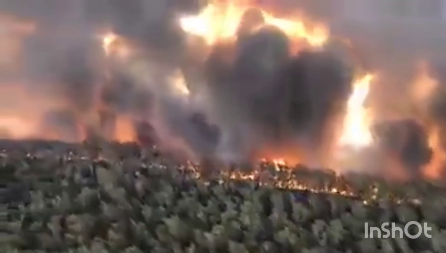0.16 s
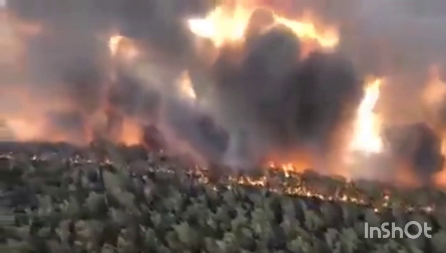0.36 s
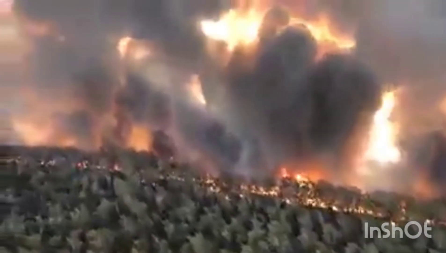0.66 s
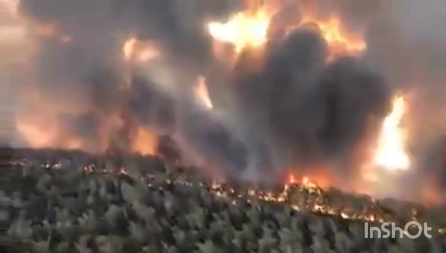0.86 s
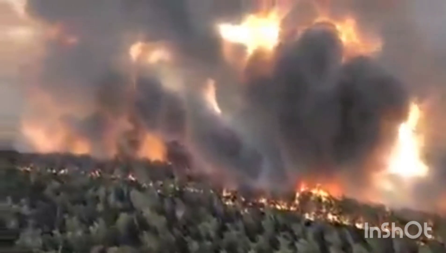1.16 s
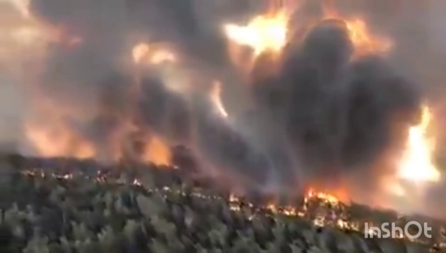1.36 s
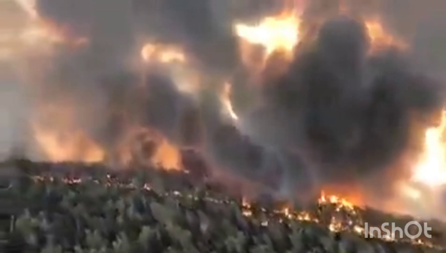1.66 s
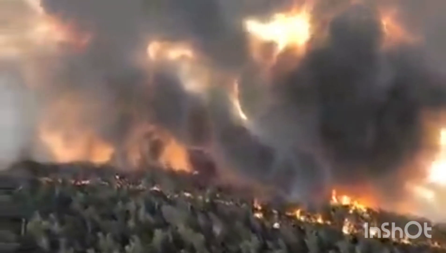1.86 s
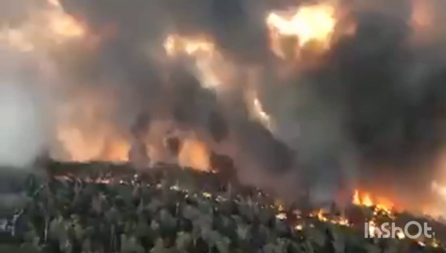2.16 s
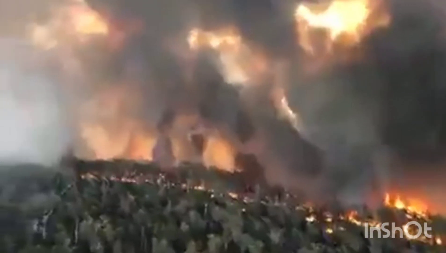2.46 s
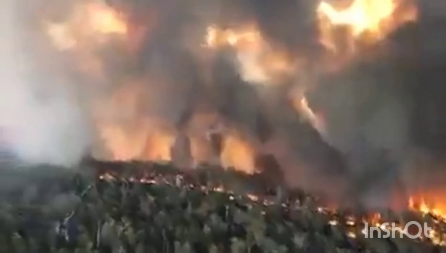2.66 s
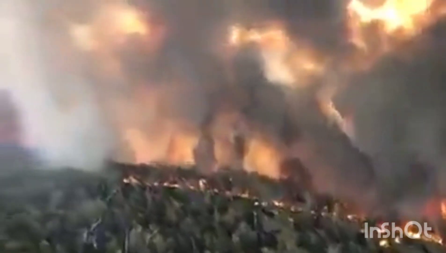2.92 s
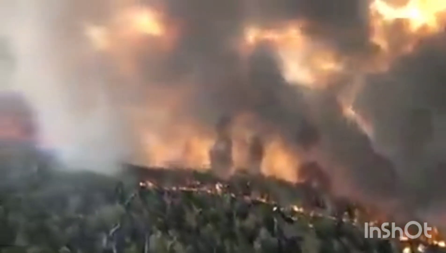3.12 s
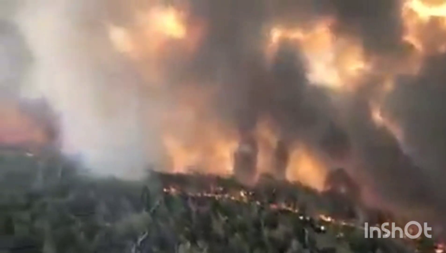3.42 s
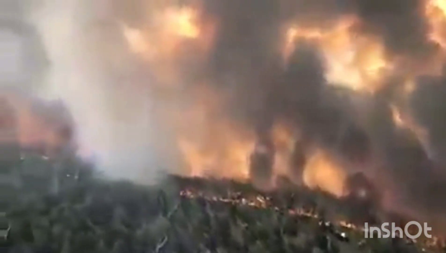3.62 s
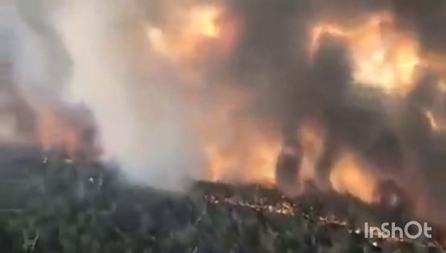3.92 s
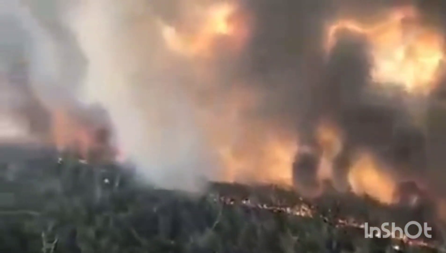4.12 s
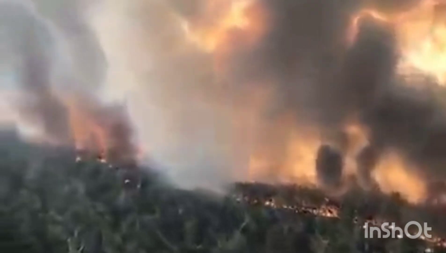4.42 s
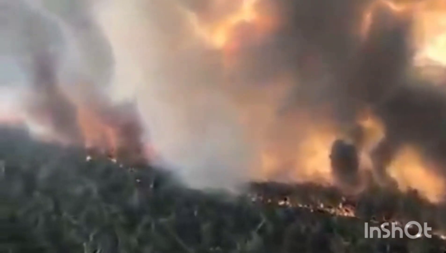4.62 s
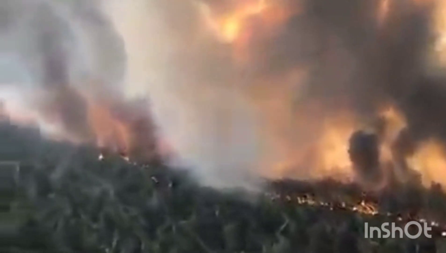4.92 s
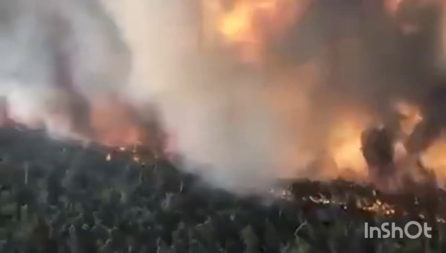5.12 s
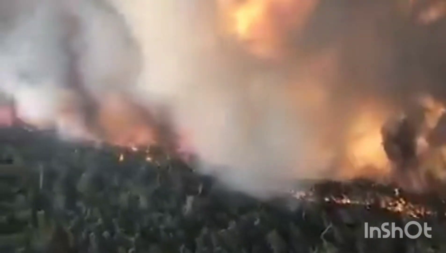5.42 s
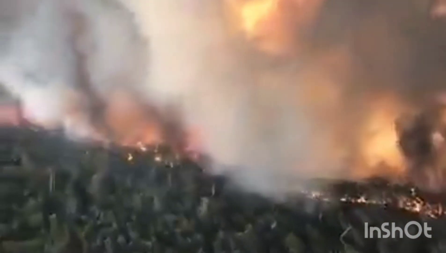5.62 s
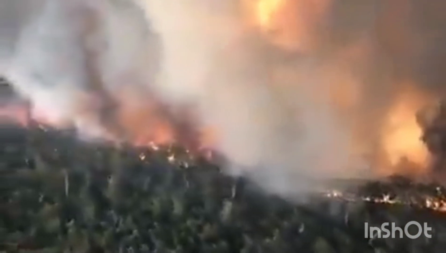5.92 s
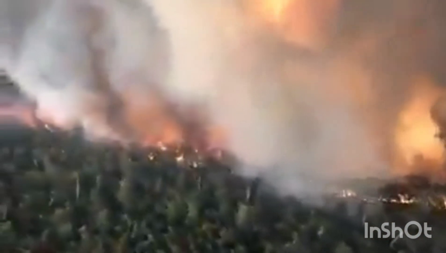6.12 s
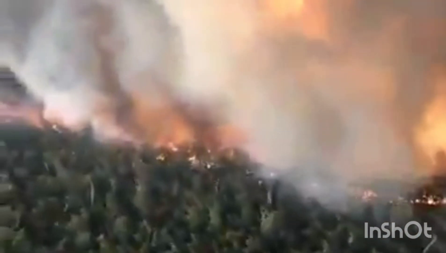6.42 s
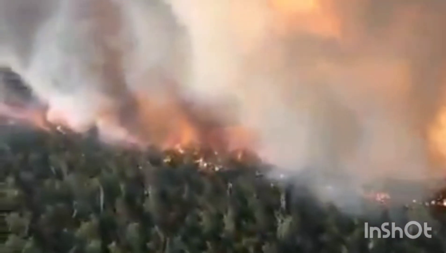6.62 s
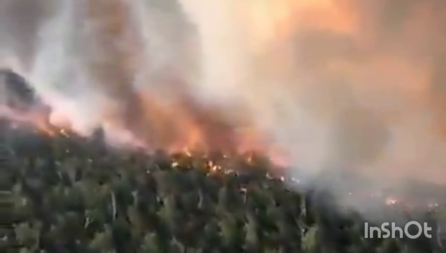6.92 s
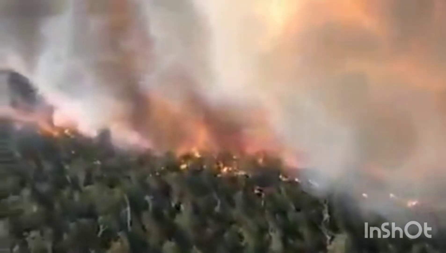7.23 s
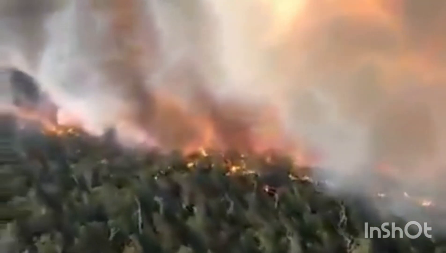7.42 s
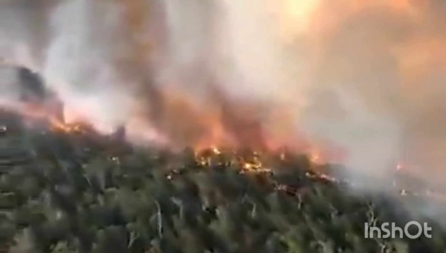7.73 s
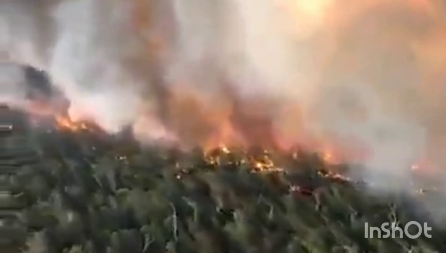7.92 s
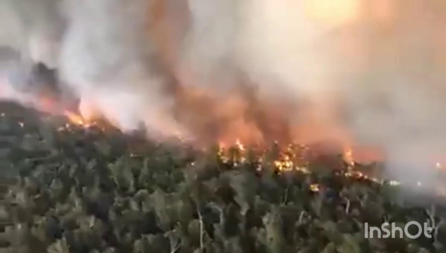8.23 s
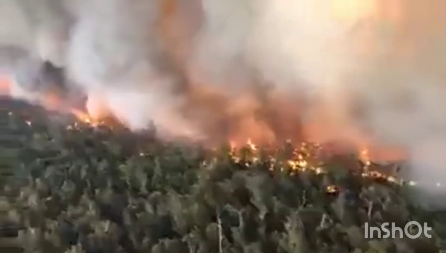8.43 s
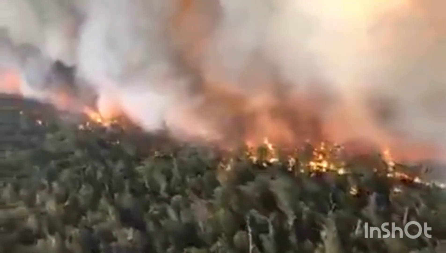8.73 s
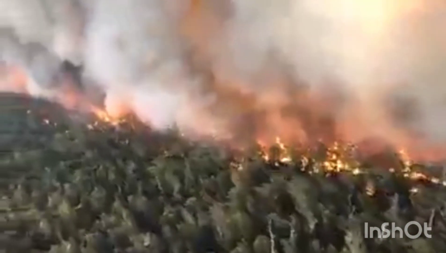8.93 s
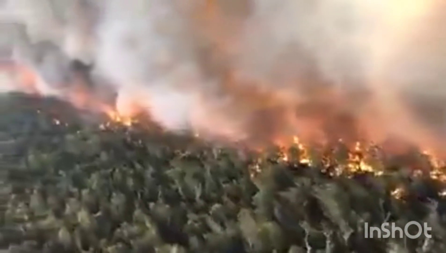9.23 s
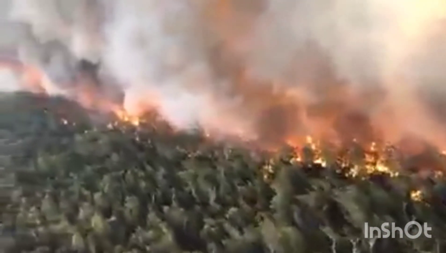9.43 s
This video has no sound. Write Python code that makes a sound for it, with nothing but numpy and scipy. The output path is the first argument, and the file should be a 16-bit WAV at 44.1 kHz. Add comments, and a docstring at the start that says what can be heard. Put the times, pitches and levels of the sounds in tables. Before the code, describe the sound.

A helicopter over a forest fire is heard from aboard, close and overloaded. From 0 s, blades slap about fifteen times a second, each a short hollow knock with a noisy crack and a low thump. Harder, brighter slaps cluster from 0.8 to 1.8 s, with a heavy one near 2.9 s. Meanwhile, rushing wash, low roar and body rumble rise, and slaps deepen and smear into pairs. Around 4.4 s the load crests with two deep wavering hums, faint turbine whine and a rough howl gliding down. At 4.9 s it steps down and fades within about half a second. Slaps stand out again, hard ones clustering from 5.4 to 6.5 s, as a second swell builds, cresting with another howl near 9.1 s and dropping after 9.5 s. Tone is muffled and clipped, with faint high hiss on peaks.

```python
"""Helicopter blades slap the air at once, each leaving a low thump, heard through an overloaded microphone.
Slaps are short rings with bursts of noise; now and then one hits harder and snaps brighter.
Twice the load builds: the slaps spread into pairs and sink into rotor wash made of coloured noise,
with two deep hum tones, an airframe rumble and a breathy turbine whine of narrow noise.
A rough howl glides down through each crest; then the load drops away."""
import sys
import numpy as np
from scipy import signal
from scipy.fft import rfft, irfft, next_fast_len
from scipy.io import wavfile
from scipy.ndimage import uniform_filter1d

SR = 44100
rng = np.random.default_rng(int(sys.argv[2]) if len(sys.argv) > 2 else 0)


def bounce(signal):
    """Save signal as a 16-bit WAV file at the path given by the first command-line argument."""
    frames = np.transpose(np.atleast_2d(signal))
    limited = np.clip(frames, -1, 1)
    pcm = np.round(limited * 32767).astype(np.int16)
    wavfile.write(sys.argv[1], SR, pcm)


N = 422037
TIME_S = np.arange(N) / SR

# crack of a blade slap: relative spectrum [freq_hz, density_db]
CRACK_SPECTRUM = [(120, -11), (220, 0.5), (330, -0.5), (470, 2.5), (570, -7.5), (730, -4.5), (920, -7),
                  (1250, -12), (1800, -16), (2600, -24.5), (2900, -35.5), (4300, -45.5)]
# snap of a hard slap: relative spectrum [freq_hz, density_db]
SNAP_SPECTRUM = [(300, 0), (500, 3), (720, 4), (950, -2), (1250, -7.5), (1800, -8.5), (2650, -19.5),
                 (3000, -27.5), (4300, -40)]
# rumble of the body: relative spectrum [freq_hz, density_db]
RUMBLE_SPECTRUM = [(15, -10.5), (30, -7.5), (45, 3), (62, 4), (100, 1.5), (130, 4), (170, -1.5),
                   (250, -5.5), (450, -9.5), (600, -18), (1200, -30.5), (4000, -44)]
# hollow boom of the body: relative spectrum [freq_hz, density_db]
BOOM_SPECTRUM = [(200, -26), (270, -2.5), (315, 3), (400, 2), (470, -11.5), (600, -31), (1500, -50)]
# broad rush of the wash: relative spectrum [freq_hz, density_db]
RUSH_SPECTRUM = [(200, -17), (330, 1), (520, 1.5), (800, -0.5), (1150, -4.5), (1700, -7), (2200, -10),
                 (2650, -15.5), (2800, -19), (3500, -21), (4300, -32)]
# low roar of the wash: relative spectrum [freq_hz, density_db]
ROAR_SPECTRUM = [(110, -5.5), (160, 3.5), (230, 1.5), (330, -2), (420, -4), (600, -5), (1200, -63)]
# even hiss: relative spectrum [freq_hz, density_db]
HISS_SPECTRUM = [(500, -15.5), (1200, 4), (2600, 2.5), (3500, 0), (4300, -19.5)]
# faint high hiss that swells with loud peaks: relative spectrum [freq_hz, density_db]
HIGH_HISS_SPECTRUM = [(3000, -29), (4500, -5.5), (8000, -5.5), (11000, -12.5), (15000, -20)]
# blades meeting the tip vortices [time_s, lead_delay_ms, trail_delay_ms]
SLAP_DELAYS = [(0, 26.5, 30.4), (.35, 28, 31.3), (.56, 17, 23.4), (1.2, 16.4, 23.5), (1.52, 23, 26),
               (1.95, 18.4, 23.2), (2.45, 16.6, 24.5), (3.3, 8.73, 23.9), (4.9, 7.6, 25.1),
               (5.4, 16.6, 21.2), (5.7, 16.2, 20), (6.1, 19, 27), (6.55, 13.2, 36.3), (6.95, 13, 43),
               (7.4, 8.05, 46), (7.8, 7.44, 31.7), (9.57, 14.4, 35.2)]
# hardest slaps, relative levels [time_s, ring_db, ring_hz, snap_db]
HARD_SLAPS = [(0.167, -12, 732, -17.5), (0.56, -7, 283, -20), (0.828, 0, 423, -13.5),
              (0.971, -1, 460, -9.5), (1.032, 3, 393, -9), (1.099, -2.5, 310, -9.5),
              (1.176, -1.5, 437, -11), (1.245, 1, 355, -9.5), (1.452, -2, 472, -6.5),
              (1.516, 1, 438, -11.5), (1.649, -1, 319, -8.5), (1.724, -4, 744, -7),
              (1.781, 6.5, 328, -10.5), (2.657, 4, 291, -6), (2.744, -0.5, 697, -3), (2.866, 14, 299, -10),
              (3.267, 1.5, 317, -3.5), (4.285, 3, 282, -3), (5.451, 0.5, 410, -12), (5.596, -2.5, 475, -9),
              (5.726, -5.5, 473, -10.5), (5.801, 2, 444, -10.5), (5.867, 0, 403, -10),
              (6.074, -2.5, 410, -7.5), (6.141, -1.5, 362, -11.5), (6.349, -3.5, 721, -7),
              (6.406, 1.5, 305, -10.5), (6.48, 2, 370, -9), (7.018, -7, 675, -10.5), (7.389, -2, 730, -7.5),
              (7.886, -0.5, 293, -8)]
# swells of rotor load [start_s, crest_s, end_s, strength_0_to_1, rush_rise_power, lows_rise_power]
LOAD_SWELLS = [(0, 4.45, 4.92, 1.0, 0.73, .72), (5.35, 9.1, 9.475, .98, 0.52, 0.48)]
# slap level before trims [no_load_db, third_load_db, two_thirds_load_db, full_load_db]
SLAP_LEVELS_DB = (-18.5, -8, -2.5, -2)
# thump level [no_load_db, third_load_db, two_thirds_load_db, full_load_db]
THUMP_LEVELS_DB = (-16, -6, -5.5, -14)
# rumble level [no_load_db, third_load_db, two_thirds_load_db, full_load_db]
RUMBLE_LEVELS_DB = (-32, -22, -16.5, -19)
# boom level before trims [no_load_db, third_load_db, two_thirds_load_db, full_load_db]
BOOM_LEVELS_DB = (-31.5, -29, -22.5, -26)
# rush level [no_load_db, third_load_db, two_thirds_load_db, full_load_db]
RUSH_LEVELS_DB = (-36, -27, -20, -11.5)
# roar level [no_load_db, third_load_db, two_thirds_load_db, full_load_db]
ROAR_LEVELS_DB = (-39.5, -29.5, -23, -10)
# lower hum level [no_load_db, third_load_db, two_thirds_load_db, full_load_db]
HUM_LOW_LEVELS_DB = (-42, -33, -31.5, -12.5)
# upper hum level before its gain past a crest [no_load_db, third_load_db, two_thirds_load_db, full_load_db]
HUM_HIGH_LEVELS_DB = (-43, -37.5, -28.5, -18.5)

BLADE_HZ = 14.7
SPLIT_DB_PER_MS, BOOM_DB_PER_MS = 0.1267, 0.18  # as a pair spreads: slap loss, boom gain
DROP_S, RUSH_FALL_S, ROAR_FALL_S, HUM_FALL_S = 0.022, 0.4, 0.57, 0.5  # step down, then decays
LULL_DB, LULL_AFTER_S, LULL_WIDTH_S = -8, 0.56, 0.24  # slaps and boom dip past a crest
HUM_LOW_HZ, HUM_LOW_SAG_HZ_PER_S, HUM_SAG_S = 175.1, 6, 1.1  # at crest; sag either side of it
HUM_HIGH_HZ, HUM_HIGH_SAG_HZ_PER_S, HUM_HIGH_DB_PER_S = 235.9, 1.5, 4.5  # gains past a crest
WHINE_HZ, WHINE_RE_RUSH_DB = 1207, -11.5
HOWL_FLOOR_HZ, HOWL_GLIDE_HZ, HOWL_GLIDE_S = 1086, 214.9, 0.6
HOWL_DB, HOWL_RISE_S, HOWL_HOLD_S, HOWL_FALL_S = -17, 0.3, 0.28, 0.38
BAND_HZ, TOP_HZ = 4350, 15700  # low-passes before and after clipping


def undb(db):
    """Decibels to gain."""
    return 10 ** (np.asarray(db) / 20)


def curves(table):
    """Table columns joined by straight lines in time."""
    time_s, *columns = np.transpose(table)
    return [np.interp(TIME_S, time_s, column) for column in columns]


def walk(rate_hz):
    """Random levels held 1 / rate_hz and slewed twice; spread near 1."""
    hold = int(SR / rate_hz)
    held = np.repeat(rng.standard_normal(N // hold + 1), hold)
    return 1.283 * uniform_filter1d(uniform_filter1d(held, hold), hold)[:N]


def noise(spectrum):
    """Noise of rms 1, coloured by a spectrum on a log frequency axis."""
    freq_hz, db = np.transpose(spectrum)
    size = next_fast_len(N, True)
    bins_hz = np.maximum(np.fft.rfftfreq(size, 1 / SR), 1)
    gain = undb(np.interp(np.log(bins_hz), np.log(freq_hz), db))
    x = irfft(rfft(rng.standard_normal(size)) * gain, size)[:N]
    return x / x.std()


def burst(age, rise, fall):
    """Bell envelope with its own rise and fall, in the unit of the age."""
    return np.exp(-.5 * (age / np.where(age < 0, rise, fall)) ** 2)


def saturate(x, ceiling, order):
    """Rounds peaks under a ceiling; higher order, harder knee."""
    return x / (1 + np.abs(x / ceiling) ** order) ** (1 / order)


def swell(lows, drop, fall_s, fall_power):
    """Rotor load 0-1 as rush or lows follow it: builds, holds, steps down by a share, dies away."""
    load = np.zeros(N)
    for start_s, crest_s, end_s, strength, rush_power, lows_power in LOAD_SWELLS:
        progress = np.clip((TIME_S - start_s) / (crest_s - start_s), 0, 1)
        rise = progress ** (lows_power if lows else rush_power)
        after_s = np.clip(TIME_S - end_s, 0, 1)
        step = 1 - drop * np.minimum(after_s / DROP_S, 1)
        fall = step * np.exp(-(after_s / fall_s) ** fall_power)
        load = np.maximum(load, strength * rise * fall)
    return load


def follow(load, levels_db):
    """Layer level in dB at that load."""
    return np.interp(load, np.linspace(0, 1, len(levels_db)), levels_db)


def since_crest():
    """Seconds from the nearest swell crest, negative before it."""
    crests_s = np.array([row[1] for row in LOAD_SWELLS])
    midpoints_s = (crests_s[1:] + crests_s[:-1]) / 2
    return TIME_S - crests_s[np.searchsorted(midpoints_s, TIME_S)]


def lull():
    """Level change in dB of the short lull past each crest."""
    return LULL_DB * burst(since_crest() - LULL_AFTER_S, LULL_WIDTH_S, LULL_WIDTH_S)


def passages(delay_ms, scatter_ms):
    """Per sample: ms from the nearest blade's scattered arrival, and three random values of that blade."""
    turns = (TIME_S - delay_ms / 1000) * BLADE_HZ
    blade = np.round(turns).astype(int)
    chance = rng.standard_normal(size=(160, 4))[blade].T
    age_ms = 1000 * (turns - blade) / BLADE_HZ
    return age_ms + scatter_ms * chance[0], chance[1:]


def cycles(age_ms, hz):
    """Phase in radians: frequency times age."""
    return 2 * np.pi * hz * age_ms / 1000


def slap(delay_ms, ring_hz, ring_db, crack_db, rise_ms, fall_ms):
    """A blade cuts a tip vortex: a few slowing pressure cycles in a turbulent crack, varied per blade."""
    age_ms, (size, pitch, phase) = passages(delay_ms, scatter_ms=1.217)
    hz = ring_hz * np.exp(.11 * pitch - age_ms / 140)
    ring = undb(ring_db + 0.47 * size) * np.cos(cycles(age_ms, hz) + np.pi * phase)
    crack = undb(crack_db + 1.5 * size + 2.62 * walk(200)) * noise(CRACK_SPECTRUM)
    return burst(age_ms, rise_ms, fall_ms) * (ring + crack)


def thump(delay_ms, push_hz, rise_ms, fall_ms):
    """The blade's load follows as one low swing: push, suction, push."""
    age_ms, (size, pitch, phase) = passages(delay_ms, scatter_ms=1.8)
    hz = push_hz * np.exp(.12 * pitch)
    swing = -np.cos(cycles(age_ms, hz) + .45 * phase)
    return undb(0.41 * size) * burst(age_ms, rise_ms, fall_ms) * swing


def hard_slaps():
    """A blade hits its vortex squarely: steadier-pitched ring, brighter snap; also how far each takes over."""
    sound, share, snap = np.zeros(N), np.zeros(N), noise(SNAP_SPECTRUM)
    phases = rng.uniform(0, 2 * np.pi, len(HARD_SLAPS))
    for (time_s, ring_db, ring_hz, snap_db), phase in zip(HARD_SLAPS, phases):
        near = slice(int((time_s - .04) * SR), int((time_s + .05) * SR))
        age_ms = 1000 * (TIME_S[near] - time_s)
        hz = ring_hz * np.exp(-age_ms / 300)
        ring = burst(age_ms - 3, rise=1.4, fall=6.1) * np.cos(cycles(age_ms, hz) + phase)
        crack = burst(age_ms - 2, rise=2.0, fall=6.2) * snap[near]
        sound[near] += undb(ring_db - 2.0) * ring + undb(snap_db + 1.5) * crack
        share[near] = np.maximum(share[near], burst(age_ms - 2, rise=6.9, fall=6.8))
    return sound, share


def main_rotor(load):
    """Two slaps and a thump per blade; slaps merge as delays meet, and deepen and smear under load."""
    lead_ms, trail_ms = curves(SLAP_DELAYS)
    ring_hz = 420 * 2 ** (-.82 * np.maximum(load - .4, 0))
    smear = 0.82 + 0.4 * load
    leading = slap(lead_ms - 2, ring_hz, ring_db=1.0, crack_db=-3.0,
                   rise_ms=1.4 * smear, fall_ms=8 * smear)
    trailing = slap(trail_ms - 2, 0.856 * ring_hz, ring_db=1.5, crack_db=-2.0,
                    rise_ms=1.3 * smear, fall_ms=7.33 * smear)
    split_db = SPLIT_DB_PER_MS * (trail_ms - lead_ms)
    slap_db = follow(load, SLAP_LEVELS_DB) - split_db + lull() + 1.42 * walk(7)
    low = thump(trail_ms + 9, push_hz=75.3, rise_ms=7.3, fall_ms=4.5)
    thump_db = follow(load, THUMP_LEVELS_DB) + 1.2 * walk(9)
    hard, share = hard_slaps()
    slaps = undb(slap_db - 11 * share) * (leading + trailing)  # ducked under hard slaps
    return slaps + hard + undb(thump_db) * low


def rotor_wash(rush_db, roar_db):
    """Churning air: broad rush over low roar, both fluttering, plus a faint even hiss."""
    rush = noise(RUSH_SPECTRUM) * undb(rush_db + 1.48 * walk(25))
    roar = noise(ROAR_SPECTRUM) * undb(roar_db + 1.2 * walk(12))
    return rush + roar + undb(-46.0) * noise(HISS_SPECTRUM)


def airframe(load):
    """The body rumbles, throbs near four times the blade rate, and booms more as slap pairs spread."""
    lead_ms, trail_ms = curves(SLAP_DELAYS)
    throb_hz = 61.5 + 4 * walk(7.9)
    throb = undb(-8.0 + 3.7 * walk(4.2)) * np.sin(2 * np.pi * np.cumsum(throb_hz) / SR)
    rumble_db = follow(load, RUMBLE_LEVELS_DB) + 1.5 * walk(5)
    rumble = (noise(RUMBLE_SPECTRUM) + throb) * undb(rumble_db)
    spread_db = BOOM_DB_PER_MS * (trail_ms - lead_ms)
    boom_db = follow(load, BOOM_LEVELS_DB) + spread_db + .7 * lull() + 2.2 * walk(6)
    return rumble + noise(BOOM_SPECTRUM) * undb(boom_db)


def tone(hz, db):
    """Sine wavering in pitch and level around that rms level."""
    wavering_hz = hz * (1 + 0.00897 * walk(6) + .009 * walk(40))
    phase = 2 * np.pi * np.cumsum(wavering_hz) / SR
    return np.sqrt(2) * undb(db + 2.1 * walk(7.4)) * np.sin(phase)


def hum(load):
    """Two deep drive lines, about a fourth apart, stand out under load and sag through each crest."""
    age_s = np.clip(since_crest(), -HUM_SAG_S, HUM_SAG_S)
    gain_db = HUM_HIGH_DB_PER_S * load * np.maximum(age_s, 0)
    low = tone(HUM_LOW_HZ - HUM_LOW_SAG_HZ_PER_S * age_s, follow(load, HUM_LOW_LEVELS_DB))
    high_db = follow(load, HUM_HIGH_LEVELS_DB) + gain_db
    return low + tone(HUM_HIGH_HZ - HUM_HIGH_SAG_HZ_PER_S * age_s, high_db)


def noise_band(hz, rate_hz):
    """Noise around a fixed or moving centre; a faster rate widens it."""
    carrier = np.exp(2j * np.pi * np.cumsum(hz * np.ones(N)) / SR)
    return np.real((walk(rate_hz) + 1j * walk(rate_hz)) * carrier)


def turbine(rush_db):
    """Faint narrow whine, and a rough howl gliding down through each crest."""
    age_s = since_crest()
    howl_hz = HOWL_FLOOR_HZ + HOWL_GLIDE_HZ * np.exp(-np.maximum(age_s, -.4) / HOWL_GLIDE_S)
    envelope = burst(age_s - np.clip(age_s, 0, HOWL_HOLD_S), HOWL_RISE_S, HOWL_FALL_S)
    whine = undb(rush_db + WHINE_RE_RUSH_DB) * noise_band(WHINE_HZ, rate_hz=140)
    return whine + undb(HOWL_DB) * envelope * noise_band(howl_hz, rate_hz=750)


def scene():
    """Load swells drive all sources; saturation evens out the peaks of the loudest slaps."""
    load = swell(False, drop=0.23, fall_s=RUSH_FALL_S, fall_power=1.2)
    roar_load = swell(True, drop=0.11, fall_s=ROAR_FALL_S, fall_power=3.2)
    hum_load = swell(True, drop=0.064, fall_s=HUM_FALL_S, fall_power=4.4)
    rush_db = follow(load, RUSH_LEVELS_DB)
    blades = saturate(main_rotor(load), ceiling=.9, order=4)
    wash = rotor_wash(rush_db, follow(roar_load, ROAR_LEVELS_DB))
    return (blades + wash + airframe(load) + hum(hum_load) + turbine(rush_db))[None]


def lowpass(x, hz):
    """Steep elliptic low-pass."""
    return signal.sosfilt(signal.ellip(10, .1, 80, hz, fs=SR, output="sos"), x)


def record(dry):
    """Microphone rounds loud peaks; a narrow-band channel clips them; a faint high hiss swells with them."""
    narrow = lowpass(saturate(dry, ceiling=1.456, order=6), BAND_HZ)
    clipped = saturate(narrow, ceiling=.95, order=40)
    peak_level = np.sqrt(np.abs(uniform_filter1d((narrow - clipped) ** 2, size=1100)))
    high_hiss = undb(-29.0) * peak_level * noise(HIGH_HISS_SPECTRUM)
    return lowpass(clipped + high_hiss, TOP_HZ)


dry = scene()
out = record(dry)
bounce(out)
```